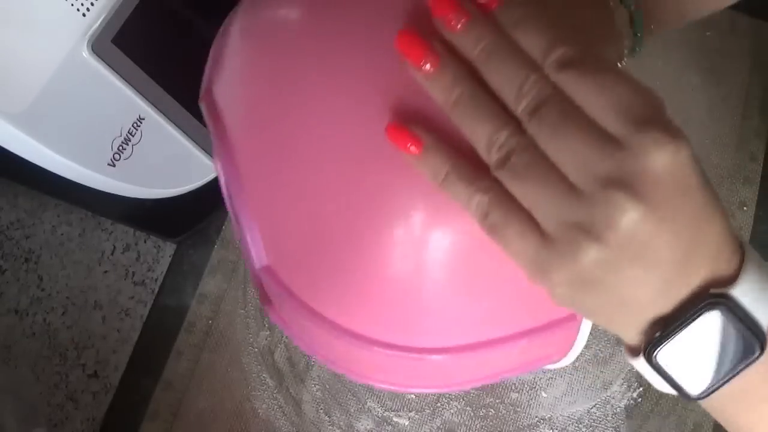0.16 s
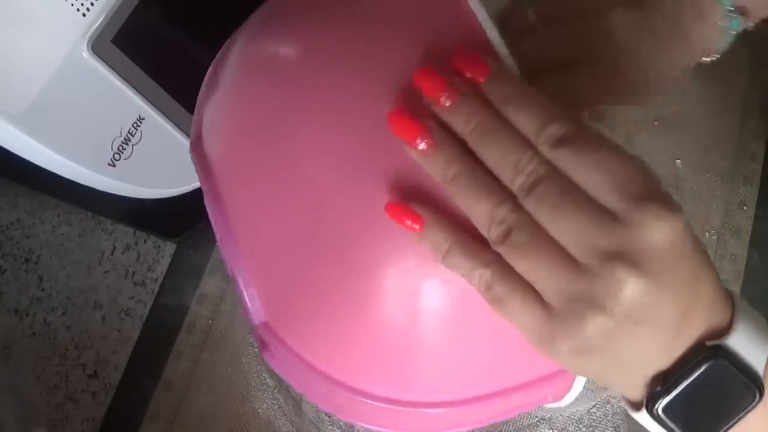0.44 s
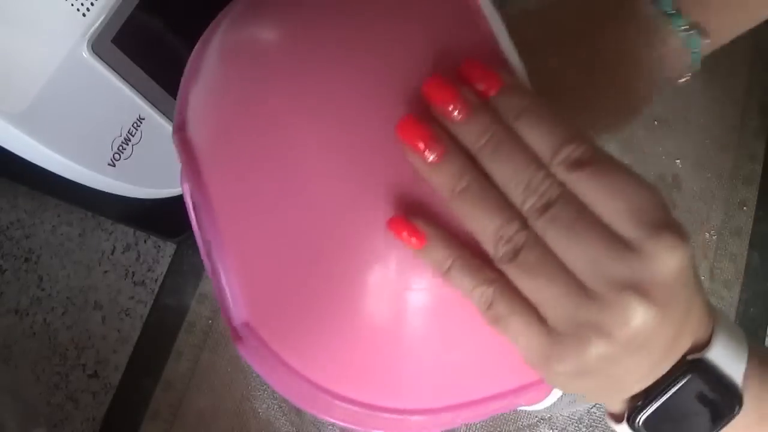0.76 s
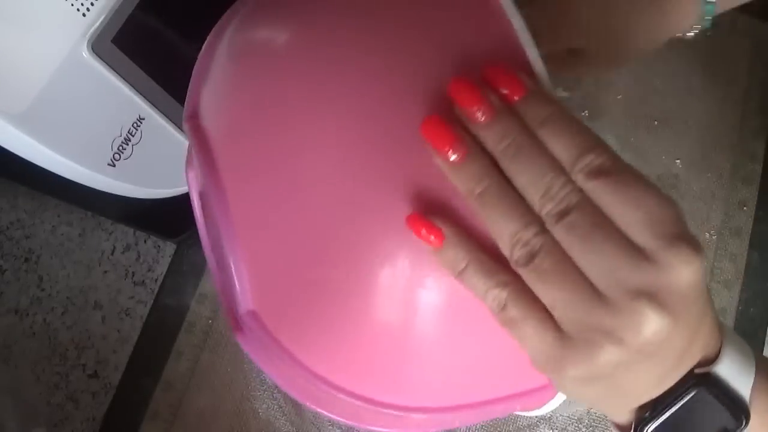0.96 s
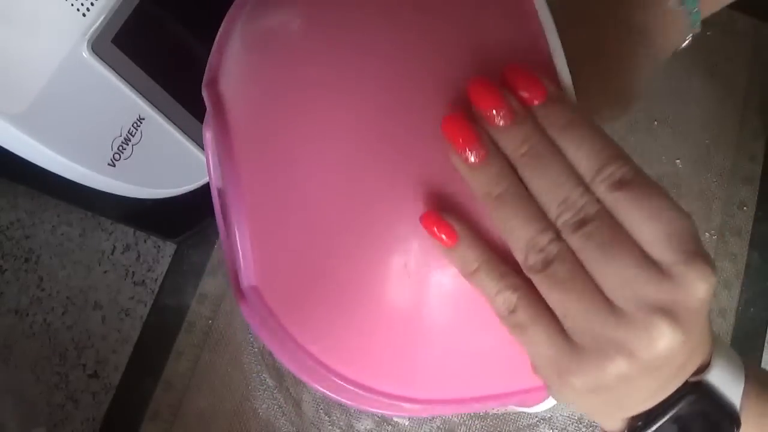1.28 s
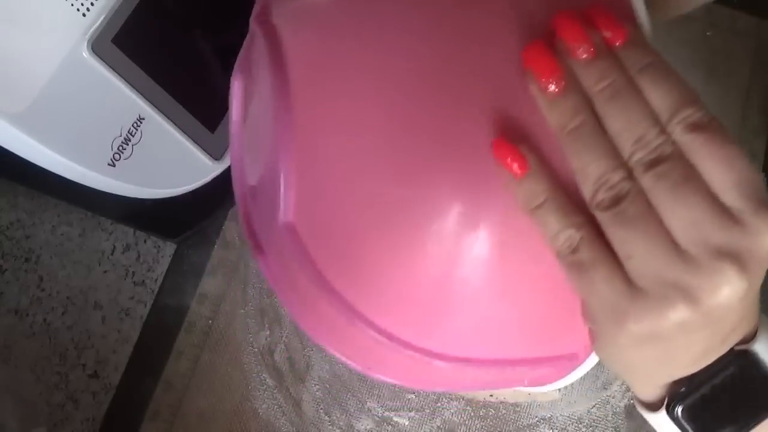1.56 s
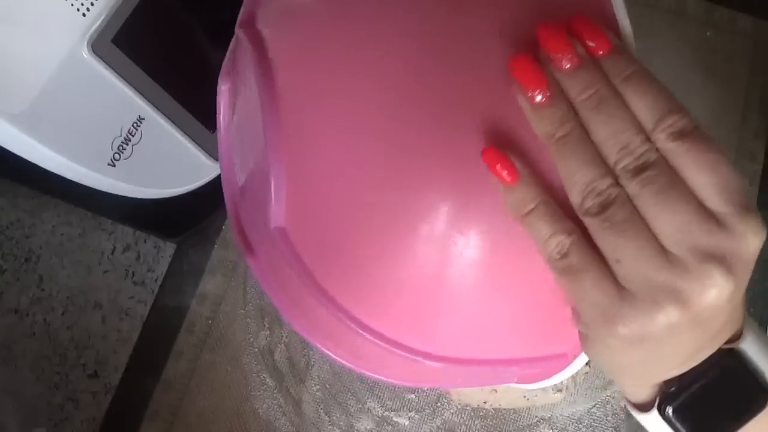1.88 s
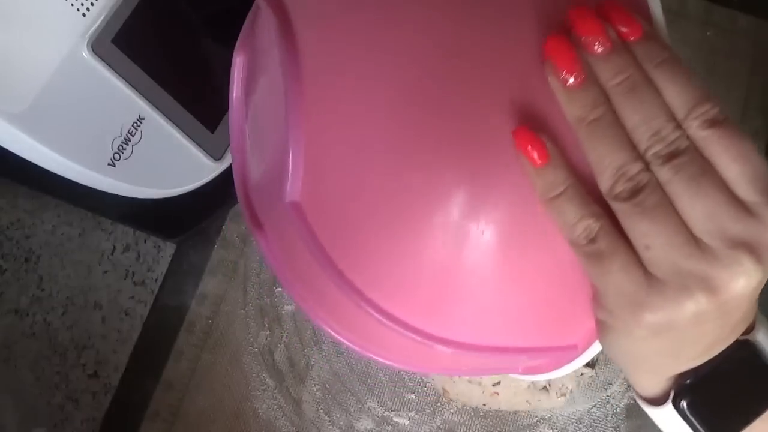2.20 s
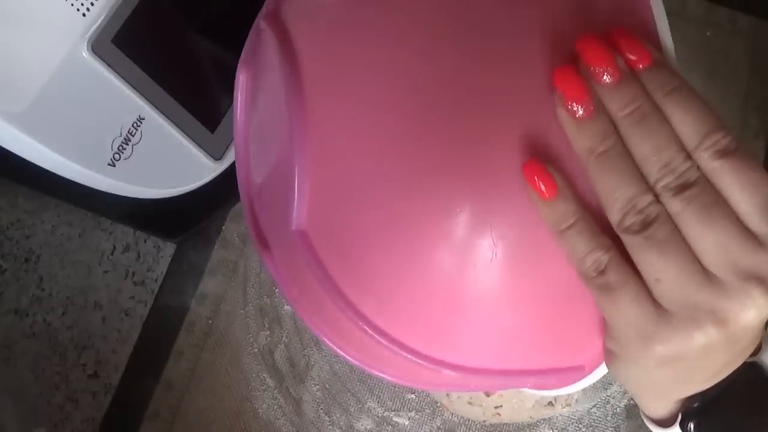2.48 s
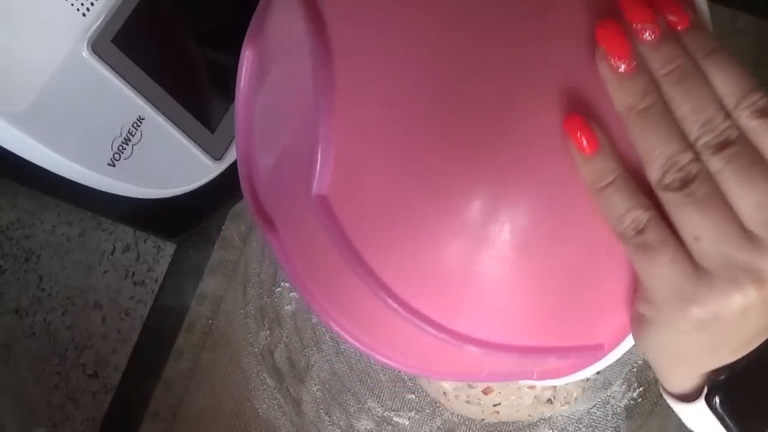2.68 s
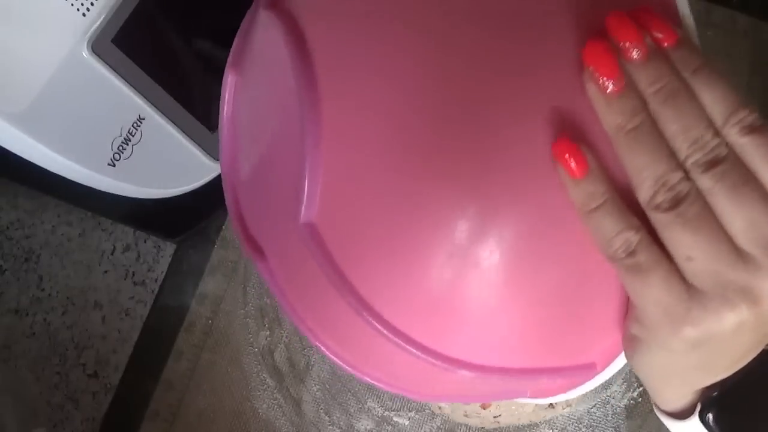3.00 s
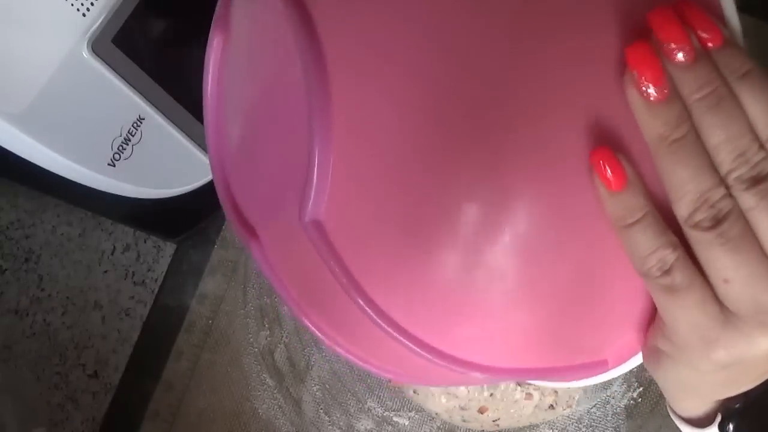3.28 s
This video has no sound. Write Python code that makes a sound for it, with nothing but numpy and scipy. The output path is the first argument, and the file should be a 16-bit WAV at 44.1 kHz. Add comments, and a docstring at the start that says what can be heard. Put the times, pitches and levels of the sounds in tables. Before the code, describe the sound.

Close, hollow clacks come from a plastic bowl knocked on a counter in a small kitchen. The nine knocks gradually quicken, each trailing a short scrape, with soft thuds of dough and a faint appliance hum.

```python
"""A floury kitchen worktop: a hand jolts an upturned plastic bowl nine times to free the dough inside.
At each jolt the rim clacks down, often twice, then skids briefly with a hollow note; both ring the
same plastic shell. Bowl and dough bump dully on the worktop, and the hand rubs faintly on the plastic.
The small room answers, over soft hiss and a low appliance hum that swells and fades."""
import sys
import numpy as np
from scipy import signal
from scipy.fft import rfft, irfft
from scipy.io import wavfile

SR = 44100
rng = np.random.default_rng(int(sys.argv[2]) if len(sys.argv) > 2 else 0)


def int16_out(signal):
    """Quantize to a 16-bit WAV file."""
    q = np.round(np.clip(np.atleast_2d(signal).T, -1, 1) * 32767)
    wavfile.write(sys.argv[1], SR, q.astype(np.int16))


N = 152145
T = np.arange(N) / SR
HZ = np.fft.rfftfreq(N, 1 / SR)
INPUT_BAND_HZ = 11000


def amp(db):
    """Decibels to gain."""
    return 10 ** (np.asarray(db) / 20)


def unit(x):
    """Scales to rms 1."""
    return x / np.sqrt(np.mean(x ** 2) + 1e-20)


def curve_at(points, hz):
    """Reads a curve on a log-frequency axis."""
    freqs, values = np.transpose(points)
    return np.interp(np.log(hz + 1), np.log(freqs), values)


def fader(points):
    """Gain over the scene from (time_s, level_db) points."""
    return amp(np.interp(T, *np.transpose(points)))


def add(mix, start_s, sound):
    """Drops a sound into the mix."""
    part = mix[round(start_s * SR):][:len(sound)]
    part += sound[:len(part)]


def stereo_pair(spectra, correlation):
    """Blends two unrelated spectra into partly alike left and right signals."""
    alike = np.clip(curve_at(correlation, HZ), 0, 1)
    right = alike * spectra[0] + np.sqrt(1 - alike ** 2) * spectra[1]
    return irfft(np.array([spectra[0], right]), N)


# Tone of the hiss: freq_hz, gain_db
HISS_EQ = [(20, -10), (40, 10), (90, 9.5), (180, 4), (280, 9.5), (550, 8), (1000, 3.5), (2000, -1),
           (2500, 2.5), (3500, -3), (7000, -3), (10500, -6.5)]
# Stereo image of the hiss: freq_hz, correlation
HISS_IMAGE = [(40, 0.97), (500, 0.73), (2000, 0.24), (10000, 0.33)]
# Level ride of the hiss: time_s, level_db
HISS_FADER = [(0, -54), (.5, -57), (1.5, -58), (1.95, -59.5), (2.3, -55.5), (2.7, -60.5), (3.45, -68.5)]

def hiss():
    """A soft bed of noise, centred in the lows and wide in the highs."""
    spectra = rfft(rng.standard_normal((2, N))) * amp(curve_at(HISS_EQ, HZ)) * (HZ < INPUT_BAND_HZ)
    return unit(stereo_pair(spectra, HISS_IMAGE)) * fader(HISS_FADER)


# Partials of the hum: harmonic, gain_db
HUM_PARTIALS = [(1, 6.5), (2, -17), (4, -7)]
# Level ride of the hum: time_s, level_db
HUM_FADER = [(0, -69), (.65, -62), (1, -59), (1.52, -54.5), (1.75, -64.5), (1.9, -72), (2.05, -66),
             (2.6, -73.5), (3.45, -68)]

def appliance_hum(pitch_hz=61.2):
    """A low appliance drone that swells and fades."""
    hum = sum(amp(db) * np.sin(2 * np.pi * (harmonic * pitch_hz * T + rng.random()))
              for harmonic, db in HUM_PARTIALS)
    return unit(hum) * fader(HUM_FADER)


# Tone of the hand on plastic: freq_hz, gain_db
RUB_EQ = [(300, -40), (2500, 13.5), (5000, 9.5), (10000, -3.5)]

def hand_rub(ticks_per_s=160, decay_s=.004, level_db=-68):
    """Faint scattered ticks as the hand shifts on the bowl."""
    ticks = (rng.random(N) < ticks_per_s / SR) * rng.uniform(0.11, 1, N)
    envelope = signal.lfilter([1], [1, -np.exp(-1 / (decay_s * SR))], ticks)
    fizz = irfft(rfft(envelope * rng.standard_normal(N)) * amp(curve_at(RUB_EQ, HZ)), N)
    return amp(level_db) * unit(fizz)


def rim_click(eq, bass_db, treble_db, focus_hz, focus_db, ring_db):
    """A click of energy 1; where the rim touches sets its colour and one narrow ring."""
    bass_hz, treble_hz, focus_octaves, ring_width_hz = 630, 2840, 0.34, 112
    smear_s, smear_step_hz = .001, 350
    hz = np.fft.rfftfreq(4096, 1 / SR)
    shelves = bass_db / (1 + (hz / bass_hz) ** 4) + treble_db * (1 - 1 / (1 + (hz / treble_hz) ** 4))
    bell = focus_db * np.exp(-.5 * (np.log2((hz + 1) / focus_hz) / focus_octaves) ** 2)
    ring = 10 * np.log10(1 + (amp(ring_db) ** 2 - 1) / (1 + (2 * (hz - focus_hz) / ring_width_hz) ** 2))
    log_gain = np.log(amp(curve_at(eq, hz) + shelves + bell + ring))
    # Minimum phase keeps the attack at the front.
    log_spectrum = np.conj(signal.hilbert(np.r_[log_gain, log_gain[-2:0:-1]]))[:len(hz)]
    # The shell delays each frequency a little differently.
    knots = np.arange(0, SR / 2, smear_step_hz)
    delay_s = np.interp(hz, knots, smear_s * rng.standard_normal(len(knots)) ** 2)
    click = irfft(np.exp(log_spectrum - 2j * np.pi * np.cumsum(delay_s) * hz[1]))[:len(hz)]
    return click / np.linalg.norm(click)


# Tone of the rim striking: freq_hz, gain_db
CLACK_EQ = [(40, -29), (170, -19.5), (260, -8), (360, -13.5), (500, -3.5), (750, -8.5), (1100, -6.5),
            (1800, -2.5), (2500, -3), (3500, -2.5), (5000, -10), (8000, -13.5), (10500, -22)]
# Rim hits: start_s, strength_db, bass_db, treble_db, focus_hz
RIM_HITS = [(0.1374, -1.5, 2, 1, 1180), (.139, 7, 11.5, 5, 1074), (0.1707, 5.5, -3, 1, 2750),
            (0.6038, 2, -14, -9, 1130), (.611, -4.5, 12.5, -3, 1650), (0.6512, 7.5, -5, -4, 1265),
            (.657, 4, -6, -6.5, 1240), (1.1396, 0.5, -6, -12, 990), (1.143, -1.5, 15, 0.5, 1460),
            (1.156, -9, 6, -12, 1500), (1.1831, 6.5, -6, -3.5, 1680), (1.1859, 6, 4, 2, 1390),
            (1.636, 8, -3.5, -2.5, 1136), (1.64, 4.5, 13.5, 10.5, 1610), (2.045, 2, -0.5, 0, 1610),
            (2.0555, 4, 2.5, -1, 1670), (2.405, 1, -12, -12.5, 1070), (2.4095, 3, 4, -0.5, 1970),
            (2.4451, -4.5, 3.5, -3, 1690), (2.51, -12, 2, -9, 1600), (2.7479, 1.5, -7.5, -10.5, 1110),
            (2.7589, 3, 0, -3, 1130), (3.014, -6, 3, -9, 1000), (3.046, -6, 2, -38, 1210),
            (3.065, -7.5, -4, -46, 1410), (3.0762, 7, 10.5, -9, 1330), (3.2966, -3, 5, -18, 1500),
            (3.316, -5, -21, -15, 1570), (3.3335, 7, -11, -26, 1580), (3.342, 3, -8, -14, 1370)]

def rim_clacks(chatter_gain=.9, chatter_decay_s=.0062):
    """The rim hits the worktop and chatters for a few milliseconds."""
    out, t = np.zeros(N), T[:2049]
    for start_s, strength_db, bass_db, treble_db, focus_hz in RIM_HITS:
        force = rng.standard_normal(len(t)) * np.exp(-t / chatter_decay_s)
        force *= chatter_gain / np.linalg.norm(force)
        force[0] = 1  # the strike, ahead of the chatter
        click = rim_click(CLACK_EQ, bass_db, treble_db, focus_hz, focus_db=6, ring_db=8)
        clack = signal.fftconvolve(force, click)
        add(out, start_s, amp(strength_db) * clack / np.linalg.norm(clack))
    return out


# Modes of the plastic bowl: pitch_hz, gain_db, t60_s
SHELL_MODES = [(250, -29, .1), (305, -31, .08), (500, -28, .1), (660, -27, .09), (935, -24, .08),
               (1075, -20, .08), (1185, -22, .06), (1297, -20, .07), (1450, -21, .07), (1568, -20, .06),
               (1690, -20, .06), (2040, -23, .06), (2790, -25, .06), (3240, -26, .06)]

def shell_ring(rim, ring_db=-18.5):
    """The rim's sound plus the short ring it excites in the plastic shell."""
    t = T[:SR // 2]
    ring = sum(amp(db - 60 * t / t60_s) * np.cos(2 * np.pi * hz * t) for hz, db, t60_s in SHELL_MODES)
    return rim + amp(ring_db) * signal.fftconvolve(rim, ring / np.linalg.norm(ring))[:N]


# Dull thuds on the worktop: start_s, level_db, pitch_hz, decay_s
THUDS = [(0.14, -42, 234, 0.015), (.139, -36.5, 430, 0.013), (0.602, -36, 252, 0.0051),
         (0.673, -42.5, 245, 0.025), (1.139, -52, 122, 0.019), (1.188, -47, 127, 0.018),
         (2.138, -51.5, 90, 0.043), (2.531, -45.5, 490, 0.024), (2.849, -42, 345, 0.019)]

def dough_bumps(relative_bandwidth=0.58):
    """Bowl and dough bump the worktop: low, quickly damped bands of noise."""
    out, t = np.zeros(N), T[:SR // 2]
    hz = np.fft.rfftfreq(len(t), 1 / SR)
    for start_s, level_db, pitch_hz, decay_s in THUDS:
        band = 1 / (1 + (2 * (hz / pitch_hz - 1) / relative_bandwidth) ** 2)
        envelope = 2 * t / decay_s * np.exp(1 - 2 * t / decay_s)
        thud = envelope * irfft(rfft(rng.standard_normal(len(t))) * band, len(t))
        add(out, start_s, amp(level_db) * thud * np.linalg.norm(envelope) / np.linalg.norm(thud))
    return out


# Tone of the rim sliding: freq_hz, gain_db
SKID_EQ = [(40, -19.5), (170, -35.5), (270, -7.5), (750, -1.5), (1000, -2), (1750, -2.5), (2300, -1),
           (3500, 0), (5000, -3.5), (8000, -9), (10500, -15)]
# Rim slides: start_s, length_s, strength_db, ramp_db, bass_db, treble_db, focus_hz, ring_db
RIM_SLIDES = [(0.153, 0.02, -39.5, -7, 26, 18, 1300, 2), (0.174, 0.054, -25, -4.5, -13, -5, 1270, 2.5),
              (0.223, 0.046, -28.5, -5, -20, -36, 904, 7), (0.6, 0.077, -46.5, 5.5, -6, -24, 1350, -3),
              (0.664, 0.045, -32.5, 7.5, -16, -6, 1617, 9.5), (0.715, 0.031, -32.5, -8, -4.5, -13, 990, 4),
              (1.146, 0.043, -34.5, 6, -16, -18.5, 1320, 3.5), (1.19, 0.049, -24, -23, 3.5, -11, 1290, 6),
              (1.644, 0.019, -23.5, 1.5, 3.5, -8.5, 1700, 8.5),
              (1.677, 0.14, -37.5, -18, 5.5, -8.5, 1120, -3.5),
              (2.047, 0.034, -25.5, -2.5, -5, -7, 1704, 8.5), (2.093, .12, -41, -8.5, 6, -9, 1500, -8),
              (2.416, 0.039, -32.5, 0, -11, -8, 1640, 11), (2.418, 0.022, -32, 0.5, 4.5, -13.5, 2030, 16),
              (2.473, 0.096, -35, -16.5, 6, -6, 1644, 6.5), (2.764, 0.014, -24, -5.5, -2, -15.5, 2130, 5),
              (2.789, 0.065, -38, 0, 2, -3.5, 1660, 8.5), (2.85, 0.022, -38, -8, -11, -15, 1400, -7),
              (3.015, 0.01, -30, -9.5, 9, -23, 880, 10), (3.037, 0.04, -36.5, 11, -15.5, -20, 1416, 3.5),
              (3.082, 0.01, -28, -4.5, 2.5, -16, 1190, 7), (3.108, 0.026, -42.5, 4.5, 10, -13.5, 890, -6),
              (3.302, 0.031, -28.5, -8.5, -5, -18.5, 1520, 5.5),
              (3.33, 0.017, -26.5, 0, -7, -10, 1140, 11.5), (3.368, 0.025, -49, 1, 13, -11.5, 1540, -2)]

def rim_skids(slips_per_s=650, slip_spread_db=1, attack_s=0.00087, release_s=0.0084):
    """The rim slides over flour: dense uneven slips with fine grit between them."""
    out, t = np.zeros(N), T[:SR // 4]
    for start_s, length_s, strength_db, ramp_db, bass_db, treble_db, focus_hz, ring_db in RIM_SLIDES:
        size, grit = rng.standard_normal((2, len(t)))
        slipping = rng.random(len(t)) < slips_per_s / SR
        slips = slipping * amp(slip_spread_db * np.clip(size, -2, 2)) * np.sign(grit)
        envelope = np.minimum(t / attack_s, 1) * amp(strength_db + ramp_db * np.minimum(t / length_s, 1))
        envelope *= np.exp(-np.maximum(t - length_s, 0) / release_s)
        force = envelope * unit(unit(slips) + grit)
        click = rim_click(SKID_EQ, bass_db, treble_db, focus_hz, focus_db=5, ring_db=ring_db)
        add(out, start_s, signal.fftconvolve(force, click))
    return out


# Decay of the room: freq_hz, t60_s
ROOM_DECAY = [(150, 0.37), (500, 0.31), (1400, 0.23), (4000, 0.28), (10000, 0.32)]

def room_tail(x, rise_s=0.0036):
    """Diffuse two-channel reverb, each band dying at its own speed."""
    t = T[:SR // 2]
    hz, frame_s, bands = signal.stft(rng.standard_normal((2, len(t))), SR, nperseg=256)
    decay = amp(-60 * frame_s / curve_at(ROOM_DECAY, hz)[:, None])
    tail = signal.istft(bands * decay, SR, nperseg=256)[1][:, :len(t)]
    tail *= np.minimum(t / rise_s, 1)
    return signal.fftconvolve(x[None], tail / np.linalg.norm(tail[0]), axes=1)[:, :N]


# Stereo image of the reverb: freq_hz, correlation
ROOM_IMAGE = [(150, 1), (1400, 0.62), (4000, 0.6), (10000, .1)]
# Tone of the early reflections: freq_hz, gain_db
EARLY_EQ = [(200, -7.5), (1200, -3), (4000, 0.5), (10000, 2)]

def kitchen(x, reverb_db=-11, early_db=-12.5, early_decay_s=0.0075, left_lag_s=21e-6, left_db=1.02):
    """Near surfaces widen the sound and the room answers; the left is a touch later and louder."""
    # The echo changes as the bowl moves: a crossfade from one tail to another and back every 0.9 s.
    turn = np.pi * T / .9
    tails = room_tail(x * np.cos(turn)) + room_tail(x * np.sin(turn))
    reverb = amp(reverb_db) * stereo_pair(rfft(tails), ROOM_IMAGE)
    t = T[:SR // 2]
    early = rng.standard_normal(len(t)) * np.exp(-t / early_decay_s)
    side = signal.fftconvolve(x, early / np.linalg.norm(early))[:N]
    side = amp(early_db) * irfft(rfft(side) * amp(curve_at(EARLY_EQ, HZ)), N)
    left = irfft(rfft(x + side + reverb[0]) * np.exp(-2j * np.pi * HZ * left_lag_s), N)
    return np.array([amp(left_db) * left, x - side + reverb[1]])


def low_pass(x, cutoff_hz):
    """A steep high cut."""
    taps = signal.firwin(255, cutoff_hz, window=("kaiser", 8), fs=SR)
    return signal.oaconvolve(x, taps[None], "same")


def scene():
    """The jolted bowl in the kitchen, over hiss and hum."""
    bowl = amp(-3) * shell_ring(rim_clacks() + rim_skids())
    return kitchen(bowl + dough_bumps() + hand_rub()) + hiss() + appliance_hum()


def record(dry):
    """The narrow-band input soft-clips on the sharpest clacks; a last high cut follows."""
    ceiling = 0.76  # share of full scale
    clipped = ceiling * np.tanh(low_pass(dry, INPUT_BAND_HZ) / ceiling)
    return low_pass(clipped, cutoff_hz=15400)


dry = scene()
out = record(dry)
int16_out(out)
```